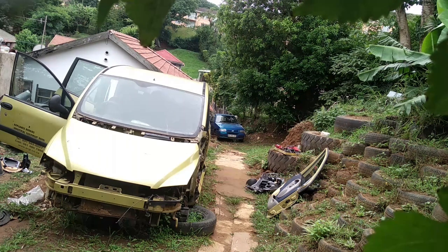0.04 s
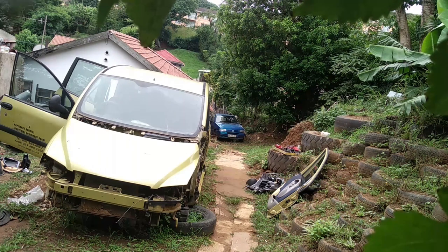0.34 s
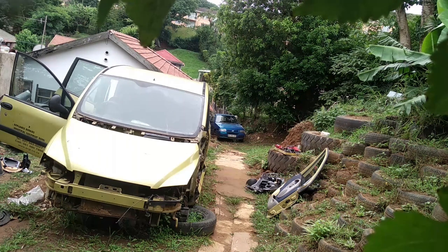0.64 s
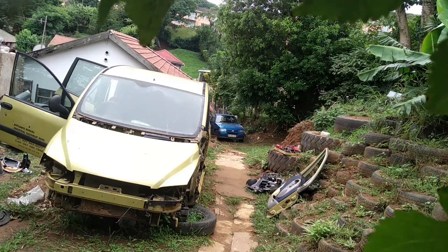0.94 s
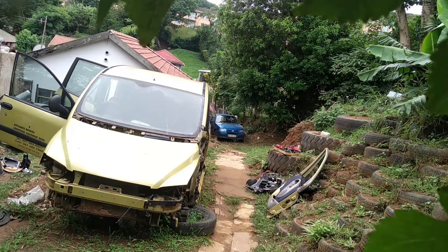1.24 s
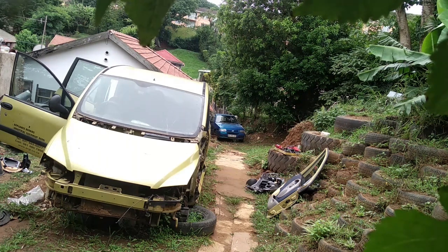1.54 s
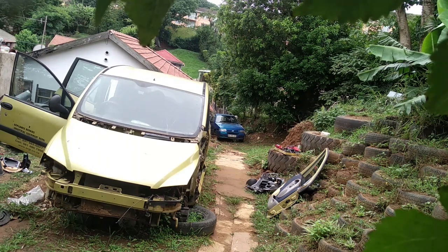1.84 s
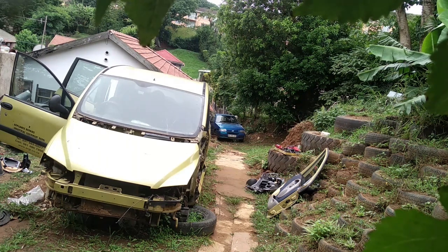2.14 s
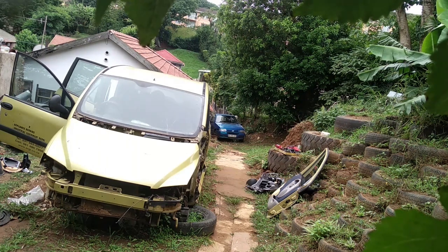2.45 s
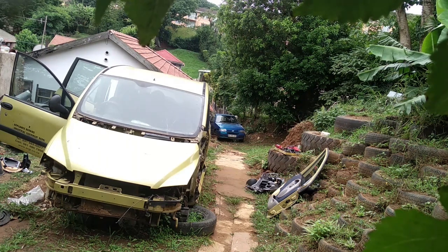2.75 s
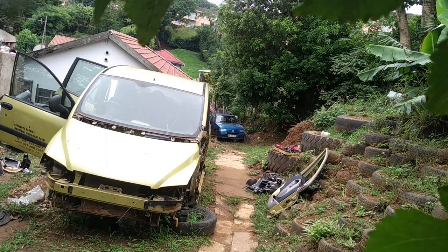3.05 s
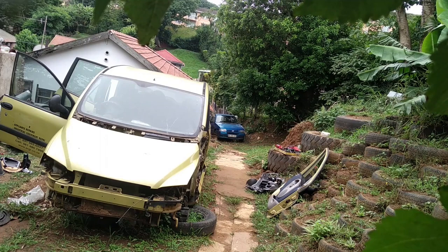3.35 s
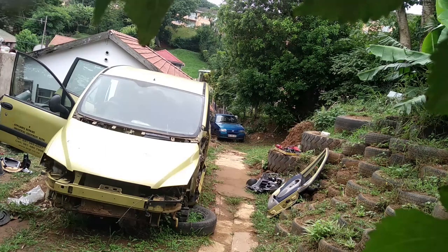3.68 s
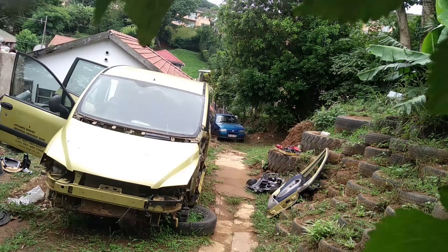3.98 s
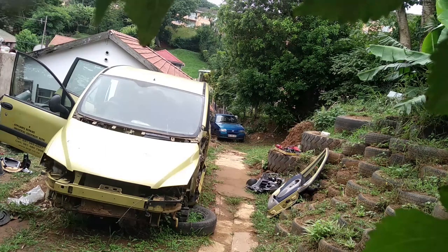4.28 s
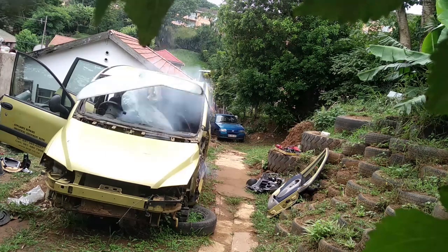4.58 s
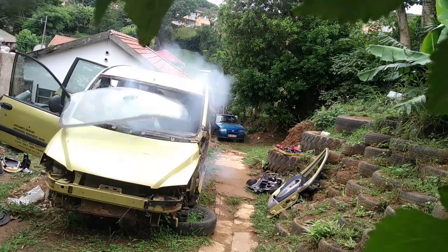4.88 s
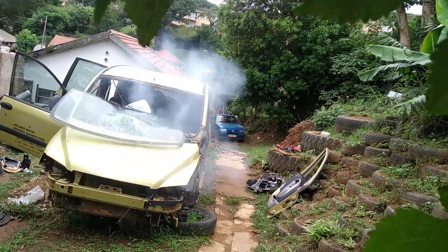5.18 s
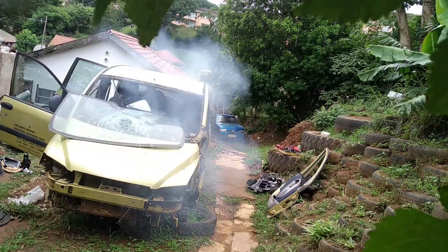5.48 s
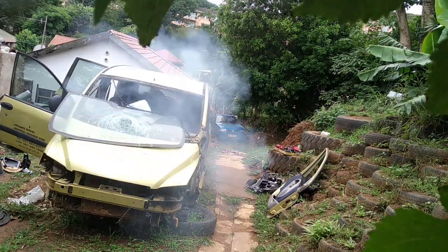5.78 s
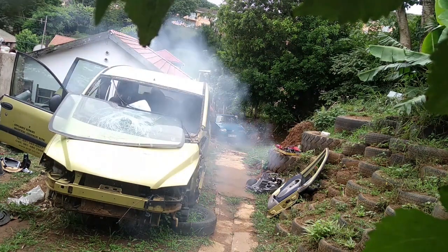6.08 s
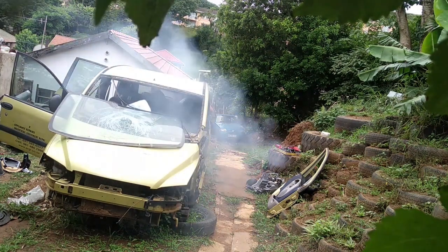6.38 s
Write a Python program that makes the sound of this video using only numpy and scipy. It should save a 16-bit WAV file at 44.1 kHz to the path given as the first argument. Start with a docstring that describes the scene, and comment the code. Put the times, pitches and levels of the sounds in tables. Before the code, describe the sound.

For the first four seconds the yard is quiet: a distant engine drones over a low hum and traffic rumble. Insects hiss faintly, leaves rustle briefly, and a far bird gives a few soft notes. At about 4.3 seconds an airbag fires inside a car near the microphone, with a very loud, overloaded bang, a deep thump and a rush of gas lasting about half a second. From 4.5 seconds the windscreen tears loose with a crunch, then crashes onto the bonnet around 4.8 to 5.1 seconds with clattering metal, thuds and chinking glass. It rocks again at about 5.3 seconds and settles. From 5.2 seconds until the end, around 6.5 seconds, the glass keeps cracking slightly to the left in sharp, irregular snaps and fine crackles. The walls add a short echo, while the far engine slows underneath.

```python
"""A yard with house walls and bushes, the microphone near a wrecked car. Far off, an engine drones over
a low hum and traffic, and slows down; insects hiss faintly, leaves stir and a distant bird calls.
The airbag fires inside the car: the bang overloads the microphone and gas rushes out.
The windscreen is thrown up, crashes onto the bonnet, settles, and its glass goes on cracking."""
import sys
import numpy as np
from scipy import signal
from scipy.fft import rfft, irfft, next_fast_len
from scipy.io import wavfile
from scipy.ndimage import uniform_filter1d, map_coordinates

SR = 44100
rng = np.random.default_rng(int(sys.argv[2]) if len(sys.argv) > 2 else 0)


def to_wav(s):
    """Save 16-bit WAV."""
    ch = np.atleast_2d(s).T  # columns
    pcm = np.round(np.clip(ch, -1, 1) * 32767)  # PCM
    wavfile.write(sys.argv[1], SR, pcm.astype(np.int16))


N = 287699
TIME = np.arange(N) / SR
FIRE_S = 4.326  # the airbag's charge goes off


def amp(db):
    """Decibels to amplitude."""
    return 10 ** (np.asarray(db) / 20)


def unit(x):
    """x at rms 1."""
    return x / np.sqrt(np.mean(x ** 2) + 1e-20)


def along(points, hz):
    """Interpolate (Hz, value) points on a log axis."""
    freqs, values = np.transpose(points)
    return np.interp(np.log(hz + 1), np.log(freqs + 1), values)


def curve(points):
    """Interpolate (seconds, value) points at every sample."""
    return np.interp(TIME, *np.transpose(points))


def since(s):
    """Seconds after s, zero before."""
    return np.maximum(TIME - s, 0)


def held(s, db, hold, t60, attack):
    """Envelope that opens at s, holds, then dies away."""
    t = since(s)
    return amp(db - 60 * np.maximum(t - hold, 0) / t60) * (1 - np.exp(-t / attack))


def bursts(times, dbs, t60s, attack, holds=0):
    """Envelope of bursts whose powers add."""
    return np.sqrt(sum(held(*row, attack) ** 2 for row in np.broadcast(times, dbs, holds, t60s)))


def wobble(rate):
    """A smooth random curve, rate knots a second."""
    return map_coordinates(rng.standard_normal(int(N * rate / SR) + 4), [TIME * rate])


def filtered(x, response):
    """x through a response given as a function of frequency."""
    size = next_fast_len(N + SR // 2)
    return irfft(rfft(x, size) * response(np.fft.rfftfreq(size, 1 / SR)), size)[..., :N]


def coloured(x, spectrum):
    """x shaped by (Hz, dB) points, at rms 1."""
    return unit(filtered(x, lambda hz: amp(along(spectrum, hz))))


def white():
    """White noise, independent left and right."""
    return rng.standard_normal((2, N))


def pair(alike):
    """White stereo noise whose left-right correlation follows (Hz, likeness) points."""
    turn = lambda hz: np.arccos(np.clip(along(alike, hz), -1, 1)) / 2
    mid, side = filtered(white(), lambda hz: np.array([np.cos(turn(hz)), np.sin(turn(hz))]))
    return np.array([mid + side, mid - side])


# The yard's reverberation. Each row: frequency in Hz, t60 in seconds.
YARD_DECAY = [(150, 0.38), (1500, 1), (6000, 1), (15000, 0.47)]

def yard(x):
    """House walls and bushes scatter a short tail; bass and highest treble fade before the middle."""
    hz, t, spectra = signal.stft(rng.standard_normal((2, SR // 2)), SR, nperseg=256)
    tail = signal.istft(spectra * amp(-60 * t / along(YARD_DECAY, hz)[:, None]), SR, nperseg=256)[1]
    tail = np.pad(tail / np.linalg.norm(tail[0]), ((0, 0), (SR // 100, 0)))  # arrives 10 ms late
    return signal.fftconvolve(x, tail, axes=1)[:, :N]


# Far traffic. Each row: time in seconds, level in dB.
TRAFFIC_LEVEL = [(.2, -41.5), (.9, -43), (1.4, -40), (2.3, -40), (3.7, -41), (6.5, -42)]
# Its colour from the yard. Each row: frequency in Hz, relative level in dB.
TRAFFIC_COLOUR = [(15, -30), (25, -8), (86, -2.5), (116, -15.5), (169, -3.5), (215, -12), (240, -5.5),
                  (297, -9), (331, -7.5), (368, -14.5), (509, -8.5), (700, -10.5), (1380, -20.5),
                  (2200, -27), (4000, -35.5), (14300, -53)]
# Its spread at the microphone. Each row: frequency in Hz, left-right correlation.
TRAFFIC_ALIKE = [(60, 0.97), (180, 0.97), (550, 0.61), (1650, -0.085), (4970, 0.049), (15000, 0.25)]

def traffic():
    """Far traffic reaches the yard as a slowly wavering rumble."""
    level_db = curve(TRAFFIC_LEVEL) + 1.95 * wobble(1.675) + 0.38 * wobble(9.8)
    return amp(level_db) * coloured(pair(TRAFFIC_ALIKE), TRAFFIC_COLOUR)


# Insect swells. Each row: peak time in seconds, half length in seconds, level in dB.
INSECT_SWELLS = [(.04, 0.05, -64.5), (.78, 0.26, -68), (1.248, .13, -70), (1.65, .15, -67),
                 (2.5, 0.22, -65), (3.22, 0.2, -65), (4.15, 0.31, -66.5)]

def insects():
    """Insects in the bushes hiss in a thin band that swells now and then."""
    band = coloured(white(), [(3500, -58), (4600, 2), (5200, 4), (5800, -8), (8000, -55), (12000, -56)])
    swell = sum(amp(db) * np.exp(-((TIME - s) / half) ** 2) for s, half, db in INSECT_SWELLS)
    return (amp(-74.5) + swell) * band


# Leaves around the yard. Each row: start in seconds, level in dB, t60 in seconds.
RUSTLES = [(.385, -46.5, 0.29), (1.35, -56, 0.38), (1.6, -57, 0.25), (3.44, -62, .15), (3.62, -55.5, 0.6)]

def leaves():
    """A few leaves stir in short, bright rustles."""
    rustle = coloured(white(), [(2000, -15), (6500, 2), (8500, -9), (13000, -13)])
    return bursts(*np.transpose(RUSTLES), attack=0.024) * rustle


def hiss():
    """A faint, steady treble hiss lies behind everything."""
    return amp(-65) * coloured(white(), [(1500, -6.5), (8000, 0), (15000, -2)])


# A far bird's notes. Each row: peak time in seconds, pitch in Hz, level in dB.
BIRD_NOTES = [(1.27, 3200, -65), (3.2, 2930, -67), (3.85, 3100, -62), (3.92, 2710, -59)]

def bird():
    """Soft, wavering notes carry from far off in the trees and scatter round the yard."""
    notes = np.zeros(N)
    for s, hz, db in BIRD_NOTES:
        cycles = np.cumsum(hz * (1 + 0.07 * wobble(110))) / SR
        notes += amp(db) * np.exp(-((TIME - s) / 0.057) ** 2) * np.sin(2 * np.pi * cycles)
    return notes + yard(np.array([notes, notes]))


# Partials of the distant hum. Each row: frequency in Hz, level in dB.
HUM_PARTIALS = [(47, -58), (95, -54), (144, -58.5), (183, -59)]

def hum():
    """A low hum from far off; each partial wavers in pitch and level."""
    return sum(amp(db + 4 * wobble(2.89)) * np.sqrt(2) * np.sin(2 * np.pi * hz * TIME + 1.17 * wobble(5))
               for hz, db in HUM_PARTIALS)


# The distant engine slows. Each row: time in seconds, firings per second.
FIRING_RATE = [(0, 86), (1.1, 85.4), (2.4, 84), (4.3, 82.2), (5.4, 70.2), (6.52, 71.3)]
# It eases off for a gear change. Each row: time in seconds, exhaust level in dB.
ENGINE_LOAD = [(.3, -44.5), (.9, -42.5), (1.7, -47), (2.4, -48.5), (3.5, -47.5), (4.3, -45.5), (5.45, -45),
               (5.75, -51.5), (6.05, -46), (6.5, -46)]
# The exhaust pipe from afar. Each row: frequency in Hz, relative level in dB.
PIPE_COLOUR = [(60, -11), (90, 7.5), (170, 0), (260, 7), (340, 7.5), (430, 10.5), (520, 0.5), (720, 2.5),
               (1000, -1), (1300, -33), (2000, -43), (5000, -40)]
# Fourth-order drone and second-order boom. Each row: time in seconds, level over the exhaust in dB.
DRONE_LEVEL = [(.9, -16), (1.25, 3), (2.4, 3.5), (2.68, -3.5), (2.85, 2.5), (3.6, 1.5), (4.3, 0), (5.7, -2)]
BOOM_LEVEL = [(.9, -10), (1.4, 0.5), (2.4, -15), (3.65, -6), (4.0, 6.5), (5.5, 1.5), (6.3, 2.5)]
# Snarl of orders six to eight, strong under throttle. Each row: time in seconds, the sixth's level in dB.
SNARL_LEVEL = [(.35, -53), (.7, -48.5), (1.15, -44.5), (1.6, -52), (2.6, -56), (4.3, -56), (5.8, -59)]

def engine():
    """A distant engine: uneven exhaust pulses over clean orders (multiples) of the firing rate."""
    firings = np.cumsum(curve(FIRING_RATE) * (1 + 0.00092 * wobble(8))) / SR
    pulses = np.diff(np.floor(firings + 0.01 * wobble(90)), prepend=0)
    pulses *= amp(2.3 * np.minimum(rng.standard_normal(N), 2))
    # turbulent gas follows each pulse and fades before the next
    chuff = np.exp(-2.5 * (firings % 1)) * pair([(300, 1), (1200, 0.29)])
    puffs = coloured(unit(pulses) + amp(-1.5) * unit(chuff), PIPE_COLOUR)
    order = lambda count: np.sqrt(2) * np.sin(2 * np.pi * count * firings)
    drone = amp(curve(DRONE_LEVEL) + 0.52 * wobble(6.2)) * order(4)
    boom = amp(curve(BOOM_LEVEL) + 0.83 * wobble(9.4)) * order(2)
    third = amp(-8 + 2.9 * wobble(5.1)) * order(3)
    snarl = sum(amp(1.4 * wobble(6) + db) * np.cos(2 * np.pi * count * firings)
                for count, db in [(6, 0), (7, -4.5), (8, -9)])
    firing_note = amp(-48.5 + 1.7 * wobble(5.99)) * order(1)
    exhaust = amp(curve(ENGINE_LOAD)) * (puffs + drone + boom + third)
    return exhaust + amp(curve(SNARL_LEVEL)) * snarl + firing_note


def fractures(rate, spread_db, ring_t60, ring_db, patches=3):
    """Snaps of uneven size, rate a second, from a few patches that each ring in their own way."""
    t = np.arange(SR // 16) / SR
    out = np.zeros((2, N))
    for _ in range(patches):
        snaps = (rng.random(N) < rate / patches / SR) * rng.choice([-1, 1], N)
        snaps = snaps * amp(spread_db * np.minimum(rng.standard_normal(N), 2))
        ring = rng.standard_normal((2, len(t))) * amp(-60 * t / ring_t60)
        ring *= amp(ring_db) / np.linalg.norm(ring[0])
        ring[[0, 1], [20, 0]] += 1  # the direct snap reaches the left port 20 samples later
        out += signal.fftconvolve(snaps[None], ring, axes=1)[:, :N]
    return unit(out)


def splinters(centre_hz, spread_db, count=4000):
    """Once the pane has broken, splinters chink briefly, each at its own pitch, size and side."""
    t = np.arange(SR // 55) / SR
    pitch, size, side = rng.standard_normal((count, 3)).T[..., None]
    samples = (rng.integers(int(FIRE_S * SR), N, size=(count, 1)) + np.arange(len(t))).ravel()
    hz = np.minimum(centre_hz * np.exp(0.45 * pitch), SR / 2)
    pings = np.sin(2 * np.pi * hz * t) * (1 - t / t[-1]) * amp(spread_db * np.minimum(size, 1))
    pan = np.cos(side + np.pi / 4), np.sin(side + np.pi / 4)
    return unit(np.array([np.bincount(samples, (pings * gain).ravel(), N)[:N] for gain in pan]))


def shifting(x, depth_db=2.5):
    """Each moment another piece of glass sounds, so the colour keeps changing."""
    spectra = signal.stft(x, nperseg=256)[2]
    field = uniform_filter1d(rng.standard_normal(spectra.shape[1:]), size=5, axis=0)
    field = uniform_filter1d(field, size=7, axis=1)
    return unit(signal.istft(spectra * amp(depth_db * unit(field)), nperseg=256)[1][:, :N])


# Brief, bright tones at 3-8 kHz that colour the crunch and the gas.
# Each row: frequency in Hz, relative level in dB, t60 in seconds.
BRIGHT_TONES = [(3146, 0.5, 0.1), (3250, -2.5, .12), (3664, 1, .1), (3745, 0, .1), (3875, -4.5, 0.11),
                (4380, -8, .08), (6019, -1, 0.1), (7150, 2.5, .13), (7560, -1.5, .13), (7820, -1, .1)]

def bright_ring(x):
    """x sets bright tones ringing; each side of the microphone hears them in its own phase."""
    t = np.arange(SR // 3) / SR
    ring = sum(amp(db - 60 * t / t60) * np.sin(2 * np.pi * (hz * t + rng.random((2, 1))))
               for hz, db, t60 in BRIGHT_TONES)
    return signal.fftconvolve(x, ring / np.linalg.norm(ring[0]), axes=1)[:, :N]


# Cracks running through the glass. Each row: start in seconds, strength in dB, first snap and
# coarse grit in dB over that strength, length of the run in seconds.
CRACKS = [(5.183, -27.5, 15.5, -14, 0.0021), (5.34, -28, 17, -12, .002), (5.433, -27.5, 10, -8, .004),
          (5.4865, -33.5, 10, -15, 0.017), (5.6128, -46, 13, -8, .002), (5.6305, -26, 11, -5, 0.0035),
          (5.7348, -21.5, 11, -15, 0.015), (5.7893, -22.5, 3, -15, 0.008), (5.8043, -24, 14, -18.5, 0.06),
          (5.9135, -25, 11, -17, 0.032), (5.9295, -35, 15, -13, .002), (5.96, -23, 8, -27, 0.048),
          (6.018, -23.5, 12, -10, 0.011), (6.116, -32.5, 9, -14, 0.033), (6.1869, -22.5, 10, -17, 0.0046),
          (6.235, -32, 6, -13, .012), (6.278, -27, 9, -22, .004), (6.343, -27, 4, -17, .004),
          (6.3585, -23, 0, -10.5, 0.022), (6.4938, -45, 13, -12, .002), (6.5085, -37, 15, 5, .002)]
# Bright fractures and coarser grit. Each row: frequency in Hz, relative level in dB.
GLASS_COLOUR = [(1200, -31), (2500, -12.5), (3900, -18), (5400, -6.5), (6200, -11), (7300, -4),
                (9400, -3.5), (10700, 0.5), (15600, 0.5)]
GRIT_COLOUR = [(700, -9), (1400, -5.5), (2400, -0.5), (3700, 0.5), (5400, -1.5), (8000, -5.5), (13000, -11)]

def cracking(run_t60=0.3, snap_t60=0.023, crazing_t60=1.6):
    """A little to the left, cracks snap, run on in tiny fractures, shake splinters and leave crazing."""
    s, strength_db, snap_db, grit_db, length = np.transpose(CRACKS)
    run = lambda db, attack: bursts(s, strength_db + db, run_t60, attack, holds=length)
    snaps = coloured(fractures(rate=10000, spread_db=1, ring_t60=0.018, ring_db=0), GLASS_COLOUR)
    snaps *= bursts(s, strength_db + snap_db, snap_t60, attack=0.00031)
    grains = fractures(rate=2400, spread_db=3.5, ring_t60=0.086, ring_db=8)
    grains += amp(-9.5) * splinters(centre_hz=7610, spread_db=5)
    ticks = amp(-8) * fractures(rate=120, spread_db=3, ring_t60=0.006, ring_db=4)
    runs = run(0, attack=0.00066) * coloured(shifting(grains + ticks), GLASS_COLOUR)
    grit = coloured(fractures(rate=2700, spread_db=5, ring_t60=0.13, ring_db=9), GRIT_COLOUR)
    grit *= run(grit_db, attack=0.00051)
    # fine crazing dies away slowly, as the pane comes to rest and after each crack
    fine = shifting(fractures(rate=700, spread_db=3.5, ring_t60=0.1, ring_db=7))
    settling = held(s=5.08, db=-33, hold=0, t60=2.9, attack=0.05)
    strain = np.hypot(settling, bursts(s, strength_db - 14, crazing_t60, attack=0.045))
    crazing = strain * (coloured(fine, GLASS_COLOUR) + amp(-6) * coloured(fine, GRIT_COLOUR))
    loose = splinters(centre_hz=5100, spread_db=4, count=900)
    tinkle = run(-15, attack=0.002) * coloured(loose, [(2800, -20), (4200, -2), (5500, 0), (7000, -14)])
    return (snaps + runs + grit + tinkle + crazing) * amp([[1.2], [-1.4]])


# Glass edges on the bonnet. Each row: start in seconds, pitch in Hz, level in dB.
EDGE_STRIKES = [(4.906, 9800, -29), (4.926, 5600, -20), (4.941, 7040, -12), (5.004, 6100, -9),
                (5.053, 5900, -15.5), (5.284, 2250, -20.5)]

def chinks(width_hz=660):
    """A glass edge strikes with a brief, coarse ring around its own pitch."""
    edge = lambda centre: unit(filtered(white(), lambda hz: 1 / (1 + ((hz - centre) / width_hz) ** 2)))
    return sum(held(s, db, hold=0, t60=0.046, attack=0.0008) * edge(hz) for s, hz, db in EDGE_STRIKES)


# The windscreen tears out, lands, rebounds and rocks. Each row: start in seconds, levels in dB of
# glass crunch, pane clack, bonnet clatter and body thud, contact time in seconds.
BLOWS = [(4.48, -27, -20.5, -19, -18.5, .003), (4.67, -18.5, -24, -28, -45, 0.0041),
         (4.757, -47, -32, -33, -38, .004), (4.7813, -21, -28, -26.5, -16.5, 0.018),
         (4.85, -42, -35, -35.5, -42, 0.054), (4.905, -21.5, -24, -16, -22, 0.0095),
         (4.926, -19.5, -25, -16.5, -26, .005), (4.942, -20.5, -23, -17, -21.5, 0.025),
         (4.968, -16.5, -24.5, -16, -28, 0.024), (5.0034, -14.5, -37, -21, -34, 0.032),
         (5.04, -16, -26.5, -22.5, -32, 0.018), (5.075, -31, -31.5, -30.5, -34, 0.017),
         (5.225, -29.5, -33, -26.5, -27.5, 0.011), (5.258, -21.5, -30.5, -20.5, -31, 0.014),
         (5.283, -22.5, -34, -33, -35, 0.019), (5.434, -42, -38.5, -38.5, -39, 0.025),
         (5.54, -46, -40, -40, -43, 0.011), (5.611, -49, -38, -47, -62, 0.0035),
         (5.63, -49, -41, -47, -43, 0.018), (6.161, -46, -39.5, -48, -59, 0.0058)]
# The colours of those four sounds. Each row: frequency in Hz, relative level in dB.
CRUNCH_COLOUR = [(400, -10), (1000, -3), (1700, -12), (2800, -1), (4200, 0.5), (5600, 0), (7300, -1),
                 (11000, 0.5), (15500, -1)]
CLACK_COLOUR = [(450, -19), (750, -2), (1000, 1), (1250, -3.5), (1550, -7.5), (2100, 0), (3200, -20)]
BONNET_COLOUR = [(130, -36), (250, -2), (400, 4), (570, 3), (780, -3.5), (980, -9), (1200, -11),
                 (1400, -12.5), (2500, -26.5)]
THUD_COLOUR = [(30, 9.5), (70, 11), (120, 12.5), (190, 13), (300, -3), (600, -21)]

def windscreen(chatter_s=0.015, chatter_db=4):
    """Each blow crunches the glass, clacks the flexing pane, clatters the bonnet and thuds the body."""
    s, crunch_db, clack_db, bonnet_db, thud_db, contact = np.transpose(BLOWS)
    blows = lambda db, t60, attack: bursts(s, db, t60, attack, holds=contact)
    glass = fractures(rate=4200, spread_db=5, ring_t60=0.06, ring_db=10)
    glass += amp(-8) * splinters(centre_hz=5997, spread_db=4.5)
    # the pane rattles on contact: the level falls and jumps back once a chatter period
    chatter = lambda start: amp(-chatter_db * (since(start) / chatter_s % 1))
    rattles = [held(start, db, hold, t60=0.16, attack=0.0011) * chatter(start)
               for start, db, hold in zip(s, crunch_db, contact)]
    crunch = np.linalg.norm(rattles, axis=0) * coloured(shifting(glass), CRUNCH_COLOUR)
    clack = coloured(fractures(rate=1500, spread_db=3, ring_t60=0.034, ring_db=14), CLACK_COLOUR)
    clack *= blows(clack_db, t60=0.17, attack=0.00065)
    bonnet = coloured(pair([(300, 0.49), (1200, 0.38)]), BONNET_COLOUR)
    bonnet *= blows(bonnet_db, t60=0.19, attack=0.00091)
    thud = blows(thud_db, t60=0.41, attack=0.0025) * coloured(pair([(100, 0.95)]), THUD_COLOUR)
    return crunch + amp(-12) * bright_ring(crunch) + clack + bonnet + thud


# Lurches of the bag and panels. Each row: start in seconds, level in dB.
LURCHES = [(4.327, -11), (4.525, -12.5), (4.605, -20), (4.78, -22), (5.02, -28), (5.24, -39)]
# Their rumble. Each row: frequency in Hz, relative level in dB.
HEAVE_COLOUR = [(20, 1), (35, 4), (55, -2), (75, 5.5), (95, -6), (140, -15), (230, -21), (400, -49)]

def heave(cabin_hz=73.2):
    """The bag and panels heave, and the cabin's air rings after each lurch."""
    rumble = coloured(pair([(100, 0.99)]), HEAVE_COLOUR)
    rumble *= bursts(*np.transpose(LURCHES), t60s=0.88, attack=0.0028)
    sway = sum(held(s, db - 3.5, hold=0, t60=0.55, attack=0.0042)
               * np.sin(2 * np.pi * cabin_hz * since(s)) for s, db in LURCHES)
    return rumble + sway


# Inflator gas: first surge, venting, last leak. Each row: level in dB, hold in seconds, t60 in seconds.
OUTFLOW = [(-5, 0.047, 0.25), (-15.5, 0.22, 0.36), (-33.5, 0.7, 0.68)]
# The gas jet. Each row: frequency in Hz, relative level in dB.
JET_COLOUR = [(120, 0), (200, -3.5), (500, 0), (640, -9), (906, -5), (1350, -10), (2380, -4), (4000, -5.5),
              (9140, -5.5), (13600, -9.5), (15500, -24)]

def inflator():
    """The charge cracks and sputtering gas roars out through tearing trim, with a faint bright ring."""
    ignition = held(FIRE_S, db=-11, hold=0, t60=0.021, attack=0.00038)
    flow = np.linalg.norm([held(FIRE_S, *stage, attack=0.0063) for stage in OUTFLOW], axis=0)
    sputter = amp(0.7 * wobble(260))
    jet = fractures(rate=9000, spread_db=4, ring_t60=0.067, ring_db=10.5, patches=6)
    tearing = amp(-5.5) * fractures(rate=260, spread_db=2.5, ring_t60=0.008, ring_db=5)
    gas = (ignition + flow * sputter) * coloured(jet + tearing, JET_COLOUR)
    return gas + amp(-16.5) * bright_ring(gas)


# Modes of the car's cabin. Each row: frequency in Hz, level in dB, t60 in seconds.
CABIN_MODES = [(158.3, -15, 0.36), (193, -19.5, 0.4), (245, -3, 0.13), (420, -25, 0.19), (690, -12, 0.17),
               (947, -19, 0.11), (1160, -8.5, 0.08), (1695, -20, 0.26)]
BURST_S, SURGE_HZ = 4.339, 70
BAG_HZ, BAG_SAG_OCT_PER_S = 284.5, 16

def airbag():
    """The bag bursts its cover, slams the windscreen, rings the cabin and fills with a falling note."""
    t = since(BURST_S)
    boom = sum(amp(db - 60 * t / t60) * np.sin(2 * np.pi * hz * t) for hz, db, t60 in CABIN_MODES)
    # the pressure swing in the cabin that overloads the microphone
    surge = np.sin(2 * np.pi * SURGE_HZ * since(FIRE_S))
    surge *= held(FIRE_S, db=-4, hold=0.042, t60=0.07, attack=0.0015)
    blast = coloured(pair([(300, 0.23), (2000, 0.47)]),
                     [(60, 5), (250, 0), (1100, -2), (1500, -6), (2200, -15), (8000, -11)])
    blast *= bursts([FIRE_S, BURST_S], dbs=[-9, -2.5], t60s=0.13, attack=0.001)
    cycles = np.cumsum((t > 0) * BAG_HZ * 2 ** (-BAG_SAG_OCT_PER_S * t)) / SR
    filling = held(BURST_S, db=-10.5, hold=0.043, t60=0.11, attack=0.0071) * np.sin(2 * np.pi * cycles)
    return boom + surge + blast + filling


# Stereo width at the microphone. Each row: frequency in Hz, gain of the left-right difference in dB.
PORT_WIDTH = [(30, 4), (80, -12), (130, -2), (260, -6.5), (500, -4), (1000, 2.5), (2500, 0.5)]

def ports(x):
    """Two close microphone ports hear the low mids nearly alike."""
    mid = (x[0] + x[1]) / 2
    side = filtered((x[0] - x[1]) / 2, lambda hz: amp(along(PORT_WIDTH, hz)))
    return np.array([mid + side, mid - side])


def scene():
    """The car stands near the microphone, the yard answers it, and the background leans slightly left."""
    car = airbag() + inflator() + heave() + windscreen() + chinks() + cracking()
    background = engine() + hum() + traffic() + insects() + leaves() + hiss() + bird()
    return ports(car + amp(-15.5) * yard(car)) + background * amp([[0.8], [-0.8]])


TOP_HZ = 15750

def record(dry):
    """The bang saturates the microphone; the treble ends steeply around TOP_HZ."""
    squashed = dry / (1 + np.abs(dry) ** 4) ** (1 / 4)
    band_limit = lambda hz: np.clip((TOP_HZ - hz) / 250 + 0.5, 0, 1)
    return np.clip(filtered(squashed, band_limit), -1, 1)


dry = scene()
out = record(dry)
to_wav(out)
```